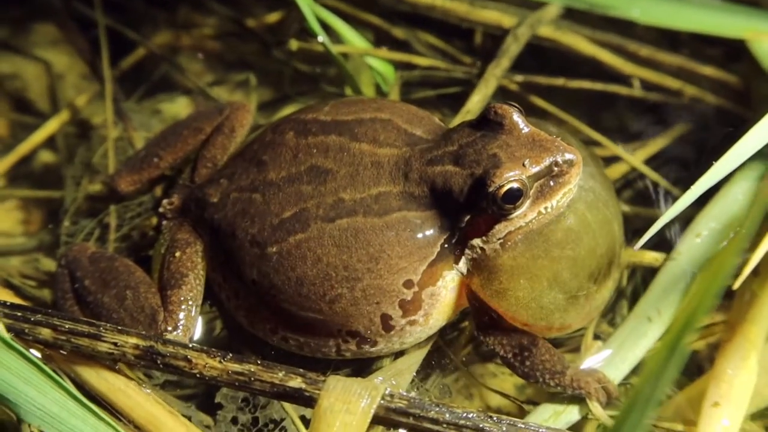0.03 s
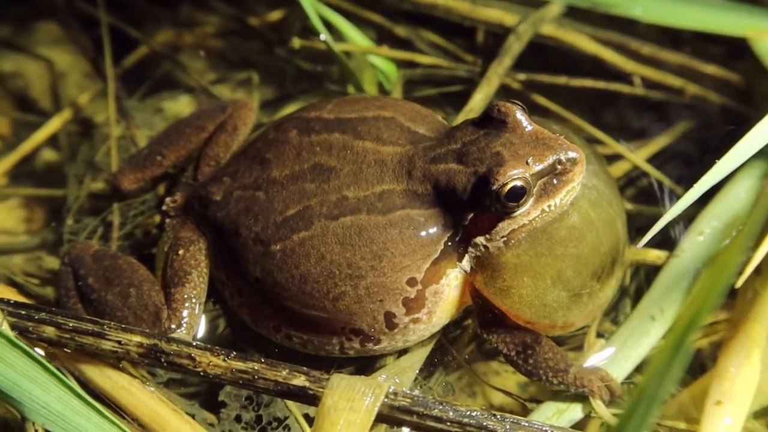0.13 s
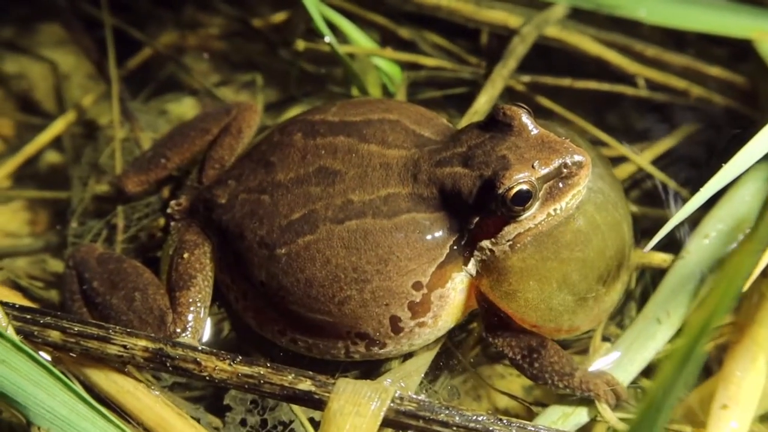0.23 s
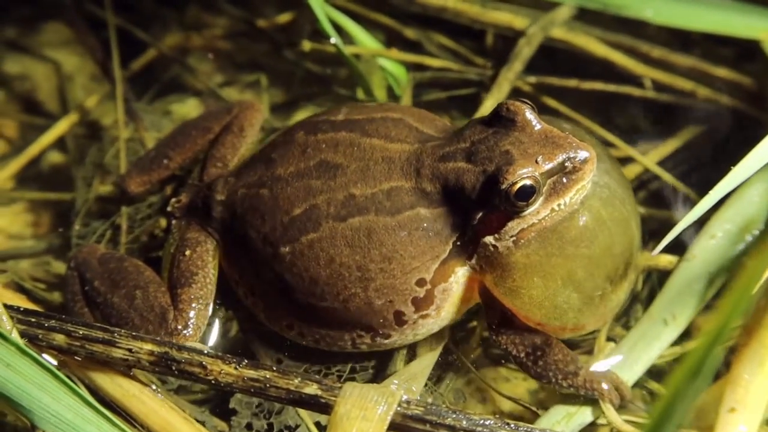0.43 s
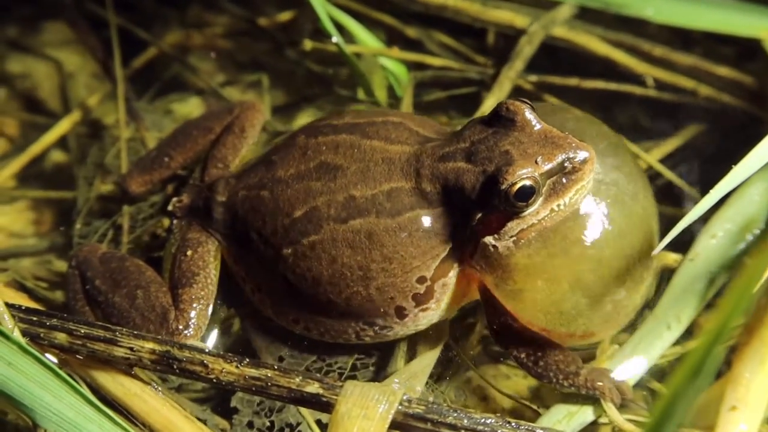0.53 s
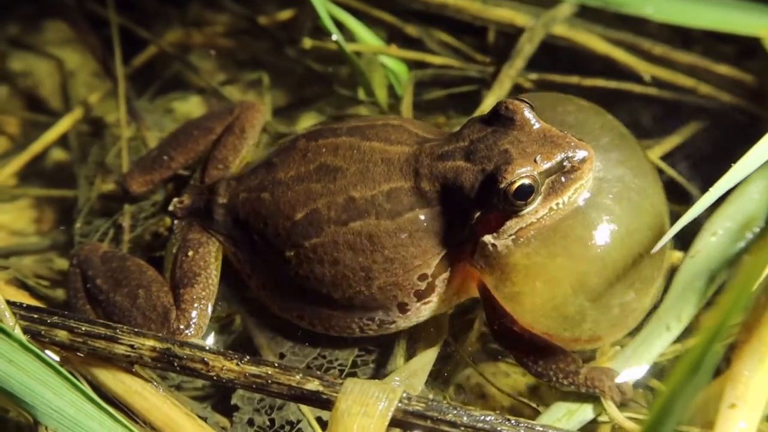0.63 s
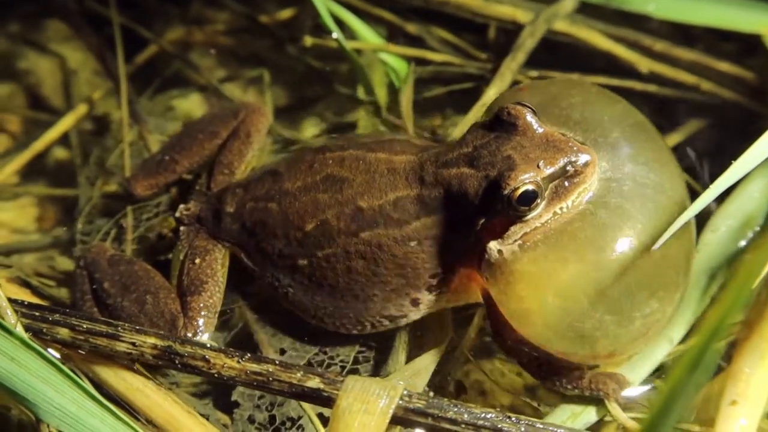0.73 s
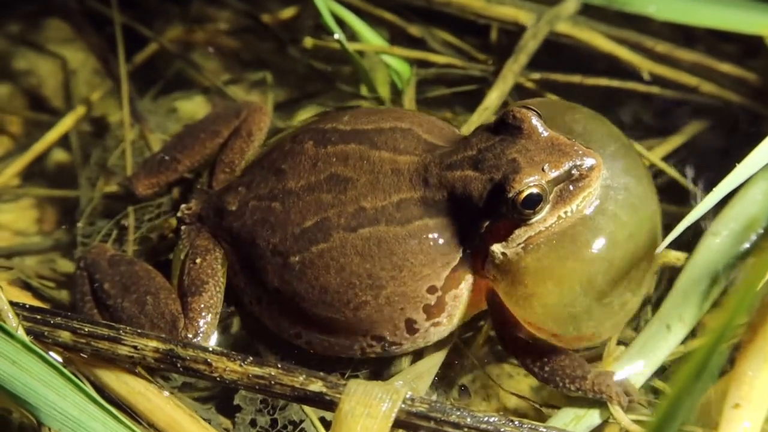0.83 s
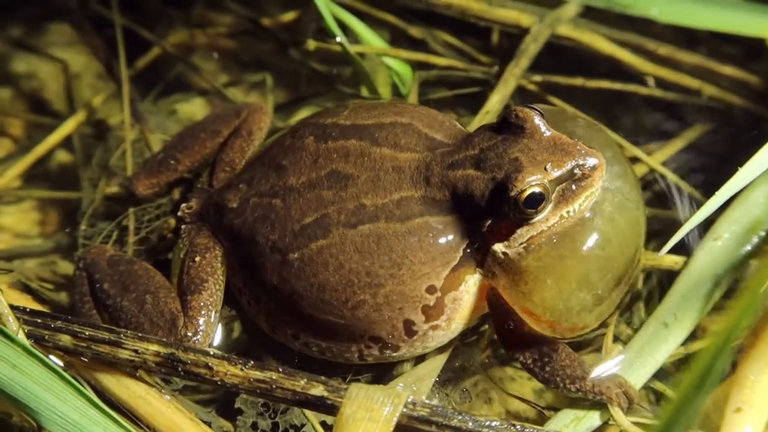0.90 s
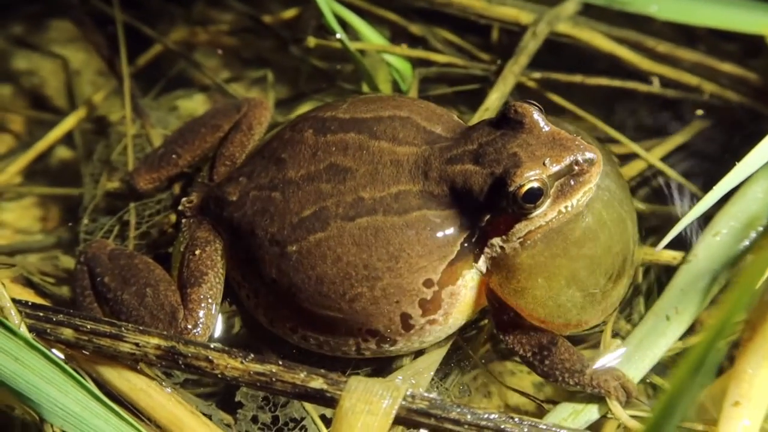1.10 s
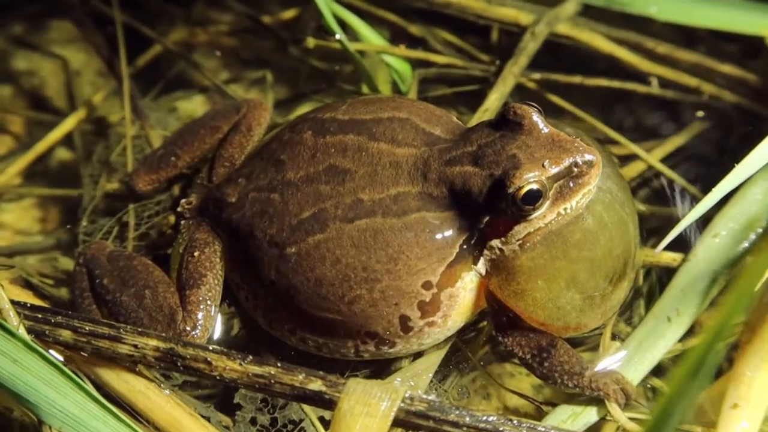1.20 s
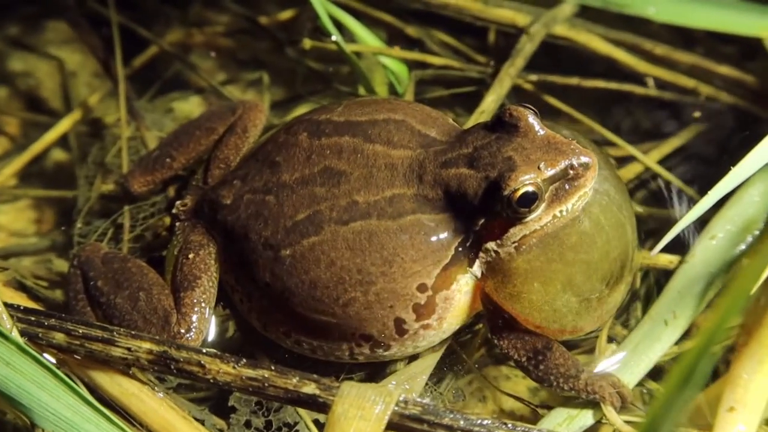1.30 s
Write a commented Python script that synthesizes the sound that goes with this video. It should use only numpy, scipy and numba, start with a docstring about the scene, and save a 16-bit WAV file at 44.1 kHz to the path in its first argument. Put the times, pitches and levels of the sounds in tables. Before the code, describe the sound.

One loud, creaky frog croak sounds up close in a marsh at night, growing louder as it climbs. Neighbouring frogs trill softly before it and answer afterwards, while a faint far chorus and a low rumble continue.

```python
"""A marsh at night: a low rumble and a far chorus sound throughout, and neighbouring frogs call from the reeds.
From 0.4 to 0.7 s a chorus frog croaks close by, in a rising run of pulses. Each is a burst of the vocal cords
whose octave rings on by resonance in the vocal sac. An automatic gain control ducks the marsh under the
croak, then lets it swell back as the neighbours answer."""
import sys
import numpy as np
from scipy import signal
from scipy.fft import rfft, irfft
from scipy.io import wavfile
from scipy.ndimage import uniform_filter1d
from numba import njit

SR = 44100
rng = np.random.default_rng(int(sys.argv[2]) if len(sys.argv) > 2 else 0)


def transcribe(signal):
    """Save signal, clipped to [-1, 1], as a 16-bit WAV file at the path in sys.argv[1]."""
    frames = np.atleast_2d(signal).T
    limited = np.clip(frames, -1, 1)
    pcm = np.round(limited * 32767).astype(np.int16)
    wavfile.write(sys.argv[1], SR, pcm)


N = 59535

# Partials of a pulse: multiple of the cord pitch, near level/dB, far level/dB,
# decay rate relative to the ring, left minus right/dB
PARTIALS = [(1, -7.5, -1, 0.93, 1.5), (2, 0.5, 1, 1.083, -1), (3, -25.5, -28, 1.4, -3.5),
            (4, -46, -43.5, 0.98, -2.5), (6, -56.5, -58, 1.5, -1)]
CHANNEL_LAG_S = np.array([[.000022], [0]])  # the left channel lags
ANTIPHASE = np.array([[1], [-1]])


def near_frog():
    """Resonance tuned by inflation: the close croak's pulses climb in pitch as the vocal sac fills."""
    # Bursts of the cords: t/s, relative level/dB, swell time/ms, ring time/ms
    bursts = [(0.3879, -14.5, 0.8, 1.6), (0.4133, 3.5, 2.3, 2.6), (0.4289, 7, 1.06, 2.2),
              (0.4439, 7.5, 0.75, 3), (0.4572, 10.5, 1.9, 2.06), (0.4706, 13.5, 1.07, 2.9),
              (0.4843, 14, 2.04, 3.3), (0.4982, 17, 2.2, 3.1), (0.5119, 18, 3, 2.5),
              (0.5254, 19.5, 3.5, 3.8), (0.5385, 20.5, 5.1, 2.5), (0.5529, 19.5, 4.3, 3.1),
              (0.5688, 15.5, 2.6, 4), (.5834, 17, 1.7, 3.4), (0.598, 16, 1.7, 3.2), (0.6111, 17.5, 2, 3.9),
              (.6258, 18.5, 1.9, 3.2), (.6385, 18.5, 3.7, 2.8), (0.6524, 21, 2.44, 3.4),
              (0.6644, 19, 7.25, 2.2), (0.6789, 20.5, 5.5, 3), (.6920, 17, 7.1, 6.3)]
    # Resonance of the sac: t/s, f/Hz
    sac_tuning = [(.41, 2035), (.455, 2015), (.475, 2050), (.53, 2080), (.575, 2130), (.63, 2155),
                  (.68, 2190), (.692, 2255)]
    # Boost of the cords' fundamental: t/s, level/dB
    fundamental_boost = [(.413, 7.5), (.43, 2.5), (.53, 0.5), (.585, 0), (.68, 0.5), (.693, 1.5)]
    # Thin high ring on each pulse: t/s, f/Hz, level re the pulse/dB
    thin_ring = [(0.429, 8130, -38), (.50, 9600, -47), (0.554, 8450, -41), (.625, 8620, -35.5),
                 (.67, 8500, -47.5), (.695, 8350, -51)]
    ring_s, ring_hz, ring_db = np.array(thin_ring).T
    wander_hz = 400 * noise([(20, -2), (1500, 3), (3000, -27.5)])  # roughens the thin ring
    wander_cycles = np.cumsum(wander_hz) / SR
    echo_s, echo_db, rasp_decay_s = .0024, -21, .003
    voice, airflow = np.zeros((2, N)), np.zeros(N)
    for start, db, swell_ms, ring_ms in bursts:
        partial_db = [row[1] for row in PARTIALS]
        partial_db[0] += np.interp(start, *np.array(fundamental_boost).T)
        sac_hz = np.interp(start, *np.array(sac_tuning).T)
        sound, envelope = vocal_pulse(sac_hz, swell_ms, partial_db, ring_ms, bend_per_ms=.013)
        t = np.arange(len(envelope)) / SR
        cycles = np.interp(start, ring_s, ring_hz) * (t - CHANNEL_LAG_S)
        cycles += wander_cycles[int(start * SR):][:len(t)]
        sound += undb(np.interp(start, ring_s, ring_db)) * envelope * np.sin(2 * np.pi * cycles)
        add(voice, start, undb(db) * sound)
        add(voice, start + echo_s, undb(db + echo_db) * sound)
        add(airflow, start, undb(db) * envelope * np.exp(-t / rasp_decay_s))
    # A body this small radiates low frequencies poorly.
    radiation = signal.butter(4, 814, "high", fs=SR, output="sos")
    return reeds(signal.sosfilt(radiation, voice + air_rasp(airflow)), db=-18.5)


def vocal_pulse(sac_hz, swell_ms, partial_db, ring_ms, bend_per_ms):
    """Damped oscillation: odd partials sag with the cords, even ones settle on the sac's resonance."""
    length_s, closing_s, snap_ms, snap_share = .022, .001, .33, .21
    t = np.arange(int(length_s * SR)) / SR
    ms = t * 1000
    # The cords snap open to part of their full swing, then swell.
    snap = np.sin(np.pi / 2 * np.minimum(ms / snap_ms, 1)) ** 2
    swell = np.sin(np.pi / 2 * np.minimum(ms / swell_ms, 1)) ** 1.18
    closing = np.clip((length_s - t) / closing_s, 0, 1)
    swing = snap * (snap_share + (1 - snap_share) * swell) * closing
    ring = np.exp(-np.maximum(ms - swell_ms, 0) / ring_ms)
    push = 1 / (1 + (ms / (.77 * swell_ms)) ** 5.6)  # falls from 1 to 0 as the pitch sags
    sag = (1 - push) * min(1, np.sqrt(1.87 / ring_ms))  # a long-held pulse keeps its pitch better
    cord_hz = sac_hz / 2 * (1.004 + .075 * (1 - 2 * sag))
    # The octave starts flat and is pulled sharp by a long swell.
    scoop = .14 * np.exp(-ms / .72)
    half_sac_hz = sac_hz / 2 * (1 + bend_per_ms * swell_ms * push - scoop)
    sound = 0
    for (multiple, _, _, decay_rate, side_db), db in zip(PARTIALS, partial_db):
        hz = multiple * (cord_hz if multiple % 2 else half_sac_hz)
        phase = 2 * np.pi * (np.cumsum(hz) / SR - hz * CHANNEL_LAG_S)
        sound += undb(db) * pan(side_db) * swing * ring ** decay_rate * np.sin(phase)
    return sound, swing * ring


def air_rasp(airflow):
    """Amplitude modulation: a faint noise of air follows the flow, strongest as the cords open."""
    # Spectrum of the rasp: f/Hz, relative spectral level/dB
    spectrum = [(300, -34), (700, -29.5), (1500, -2), (3000, 3.5), (4300, -16), (7300, -10.5),
                (9500, -26.5), (11000, -30), (16000, -36)]
    rasp = noise(spectrum) + .5 * noise(spectrum) * ANTIPHASE
    return undb(-32) * airflow * rasp


def neighbours():
    """Direct and scattered sound: frogs a few metres off call through the reeds."""
    # Calls: first t/s, last t/s, pulse count, first level/dB, middle level/dB, middle's place (0-1),
    # last level/dB, first f/Hz, last f/Hz, last swell time/ms, fundamental boost/dB, left minus right/dB
    calls = [(0.1125, 0.2607, 12, -28.5, -17, 0.75, -24.5, 2057, 2175, 4.47, -7, -5),
             (0.2808, 0.387, 9, -30, -16, 0.74, -26, 2162, 2323, 9.2, -8.5, -5.5),
             (0.7493, .8360, 7, -21, -24.5, 0.5, -67, 2036, 2100, 9, -7.5, -4.5),
             (0.8823, 0.967, 7, -22, -26, 0.44, -21, 2150, 2062, 5.2, -4, -4.5),
             (0.9286, 1.0237, 8, -24, -13, 0.64, -15.5, 2050, 2268, 4.16, -12.5, -4.5),
             (1.0410, 1.05, 2, -29.5, -31, 0.39, -36, 2200, 2040, 1.3, -9.5, -2),
             (1.0930, 1.159, 6, -24, -22.5, .4, -34.5, 2093, 2250, 6.7, 0.5, -5),
             (1.0850, 1.149, 6, -23.5, -11.5, 0.35, -11.5, 2224, 2307, 7.13, -19.5, -2),
             (1.3015, 1.3397, 4, -45, -25, 0.82, -27.5, 1900, 2025, 6.9, -6.5, -5)]
    return reeds(sum(far_croak(*call) for call in calls), db=-1.5)


def far_croak(start, end, count, first_db, middle_db, middle_at, last_db,
              first_hz, last_hz, last_swell_ms, fundamental_db, pan_db):
    """A periodic pulse train: level, pitch and swell time glide through a farther frog's call."""
    first_swell_ms = 1.9
    call = np.zeros((2, N))
    partial_db = [row[2] for row in PARTIALS]
    partial_db[0] += fundamental_db
    for along in np.linspace(0, 1, count):
        db = np.interp(along, [0, middle_at, 1], [first_db, middle_db, last_db])
        swell_ms = first_swell_ms + (last_swell_ms - first_swell_ms) * along
        sac_hz = first_hz + (last_hz - first_hz) * along
        sound, _ = vocal_pulse(sac_hz, swell_ms, partial_db, ring_ms=1.7, bend_per_ms=.010)
        add(call, start + (end - start) * along, undb(db) * sound)
    return call * pan(pan_db)


def chorus(frogs=14):
    """Superposition: the calls of many far frogs overlap into a flutter."""
    centre_hz, spread_hz, lead_s = 2138, 47, .2
    calls = 0
    for k, (when, pace, pitch, side) in enumerate(2 * rng.random((frogs, 4)) - 1):
        hz = centre_hz + spread_hz * pitch
        start = (k + when / 2) / frogs * (N / SR + lead_s) - lead_s
        calls += far_croak(start, start + .25 + .015 * pace, count=19,
                           first_db=-5, middle_db=0, middle_at=.6, last_db=-2,
                           first_hz=hz - 60, last_hz=hz + 60, last_swell_ms=4,
                           fundamental_db=-16.5, pan_db=5 * side)
    return level(reeds(calls, db=0), db=-45.5)


def reeds(direct, db):
    """Scattering: stems and water add a short, dull, exponentially decaying tail."""
    t60_s, gap_s, cutoff_hz = .039, .003, 1920
    t = np.arange(int(SR / 5)) / SR
    mid, side = rng.standard_normal((2, len(t))) * np.exp(-np.log(1000) * t / t60_s) * (t > gap_s)
    tail = mid + .13 * side * ANTIPHASE
    tail /= np.sqrt(np.sum(tail ** 2, axis=1, keepdims=True))
    tail = signal.sosfilt(signal.butter(2, cutoff_hz, "low", fs=SR, output="sos"), tail)
    return direct + undb(db) * signal.fftconvolve(direct, tail, axes=1)[:, :N]


def night_air():
    """Interaural coherence: the distant rumble is alike in both ears, the faint hiss is wider."""
    # Spectrum of rumble and hiss: f/Hz, relative spectral level/dB
    spectrum = [(20, -18), (40, -6.5), (65, 2), (150, -0.5), (260, -3), (400, -10), (700, -15), (1050, -12),
                (1600, -29.5), (2300, -8.5), (3000, -33.5), (4500, -40.5), (8000, -48.5), (14000, -58)]
    side = signal.sosfilt(signal.butter(1, 1800, "high", fs=SR, output="sos"), noise(spectrum))
    return undb(-33.5) * (noise(spectrum) + .66 * side * ANTIPHASE)


def noise(points):
    """Spectral shaping: white noise is filtered to (f/Hz, level/dB) points and scaled to unit rms."""
    hz, db = np.array(points).T
    f = np.maximum(np.fft.rfftfreq(N, 1 / SR), 1)
    response = undb(np.interp(np.log(f), np.log(hz), db))
    return level(irfft(rfft(rng.standard_normal(N)) * response, N), 0)


def undb(db):
    """The decibel scale: 20 dB is a factor of ten in amplitude."""
    return 10 ** (np.asarray(db) / 20)


def level(x, db):
    """Normalisation to a given rms level."""
    return x * undb(db) / np.sqrt(np.mean(x ** 2))


def pan(db):
    """Interaural level difference as left and right gains."""
    return undb(np.array([[db], [-db]]) / 2)


def add(mix, start, sound):
    """Superposition: a sound joins the mix at its start time, as far as it fits."""
    onset = int(start * SR)
    first, last = max(onset, 0), min(onset + sound.shape[-1], N)
    if last > first:
        mix[..., first:last] += sound[..., first - onset:last - onset]


@njit
def gain_control(peak, limit, attack_s, hold_s, hold_share, release_db_per_s):
    """Envelope following: gain drops fast on peaks, holds while the sound is loud, then climbs back."""
    release = 10 ** (-release_db_per_s / SR / 20)
    gain, envelope, wait = np.empty(len(peak)), limit, 0.
    for i in range(len(peak)):
        wait = hold_s * SR if peak[i] > hold_share * envelope else wait - 1
        if peak[i] > envelope:
            envelope += (peak[i] - envelope) / (attack_s * SR)
        elif wait < 0:
            envelope = max(limit, envelope * release)
        gain[i] = limit / envelope
    return gain


def scene():
    """Sound pressures add: night air, the near frog, its neighbours and the far chorus."""
    return night_air() + near_frog() + neighbours() + chorus()


def record(dry):
    """Compression and saturation: the croak ducks the gain, overshoots clip, and the top is cut."""
    smoothing_s, clip_hardness, top_hz = .00034, 33, 16000
    peak = np.abs(dry).max(axis=0)
    gain = gain_control(peak, limit=.8, attack_s=.00029, hold_s=.017, hold_share=.15,
                        release_db_per_s=300.)
    ducked = dry * uniform_filter1d(gain, int(smoothing_s * SR))
    clipped = ducked / (1 + np.abs(ducked) ** clip_hardness) ** (1 / clip_hardness)
    return signal.sosfilt(signal.ellip(8, .2, 70, top_hz, fs=SR, output="sos"), clipped)


dry = scene()
out = record(dry)
transcribe(out)
```